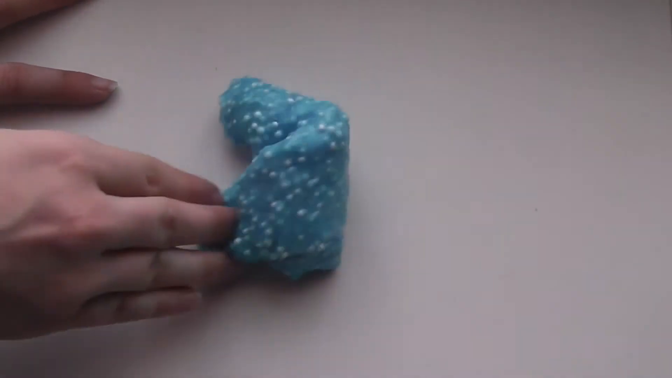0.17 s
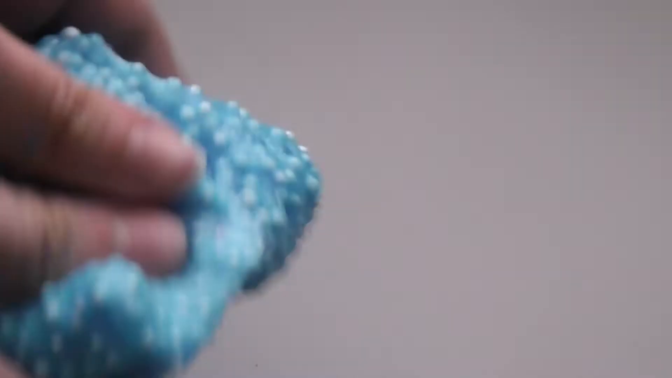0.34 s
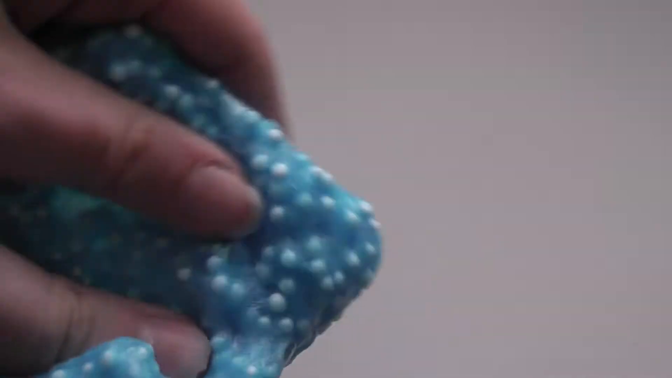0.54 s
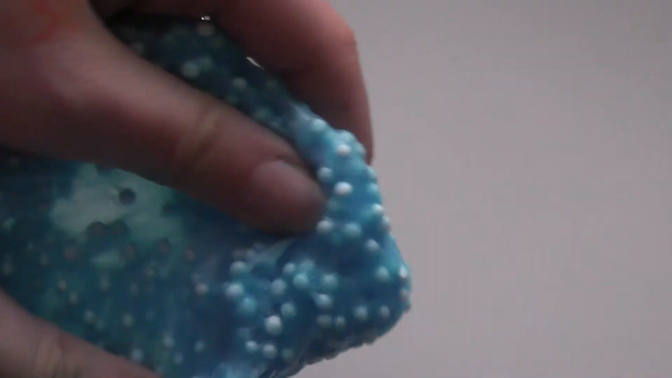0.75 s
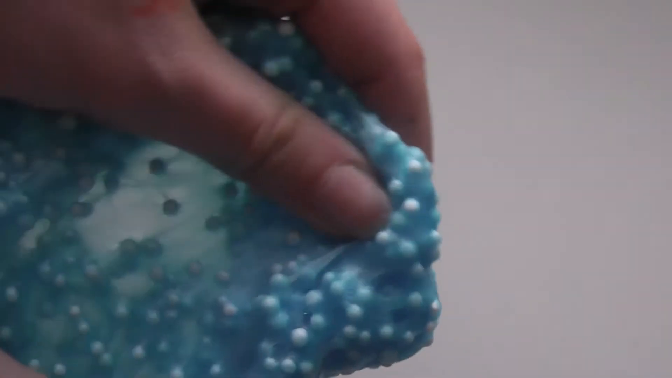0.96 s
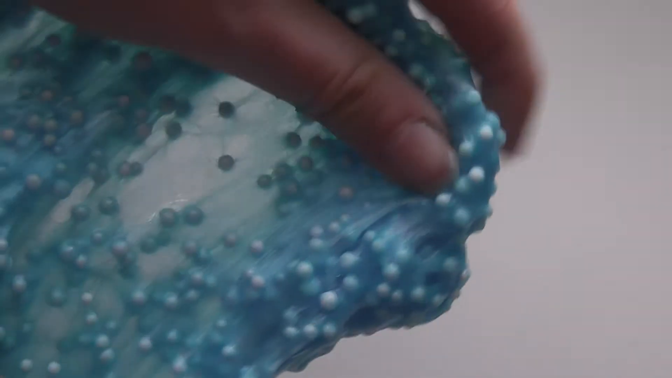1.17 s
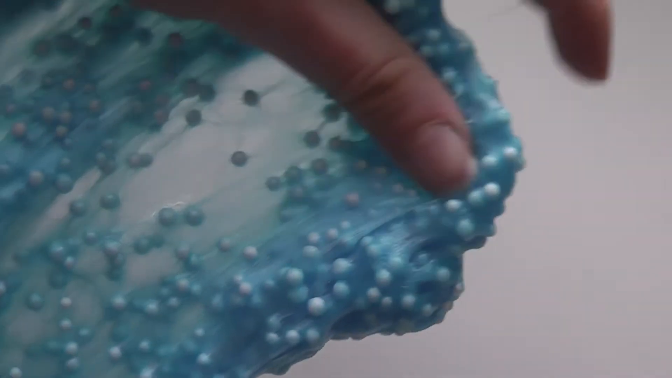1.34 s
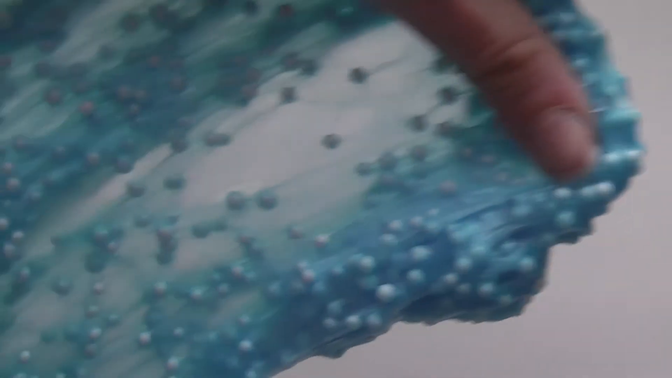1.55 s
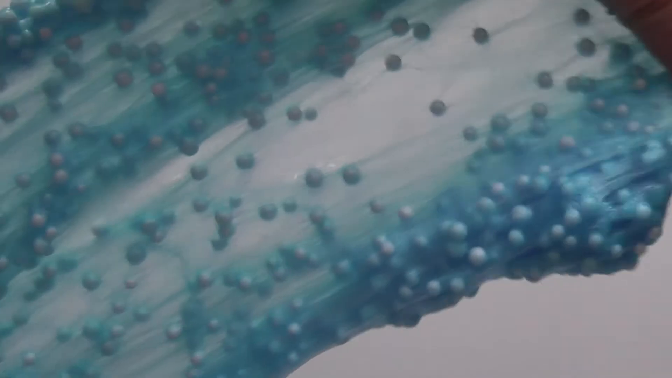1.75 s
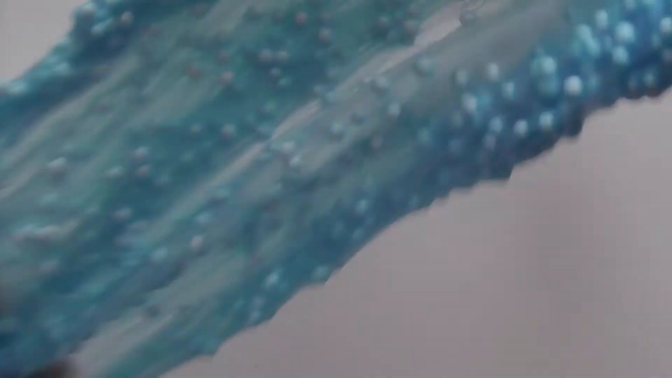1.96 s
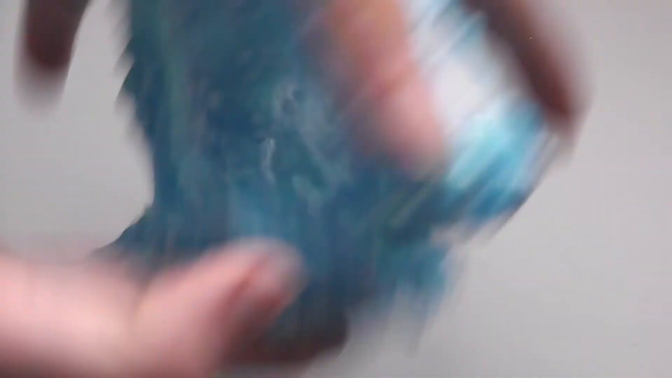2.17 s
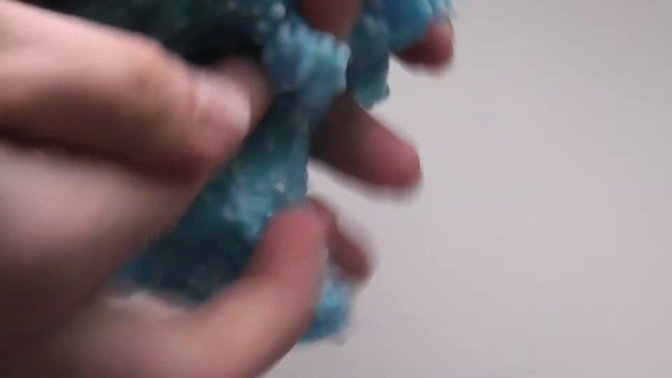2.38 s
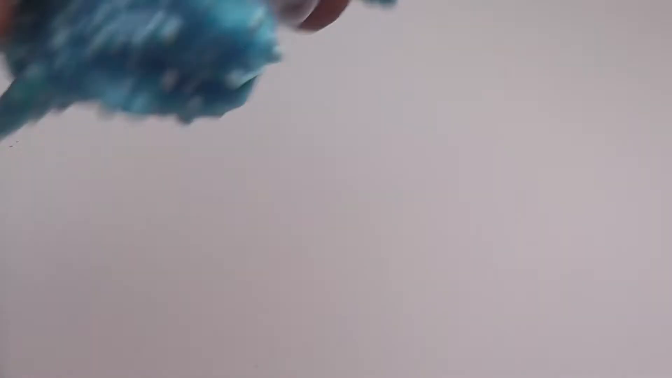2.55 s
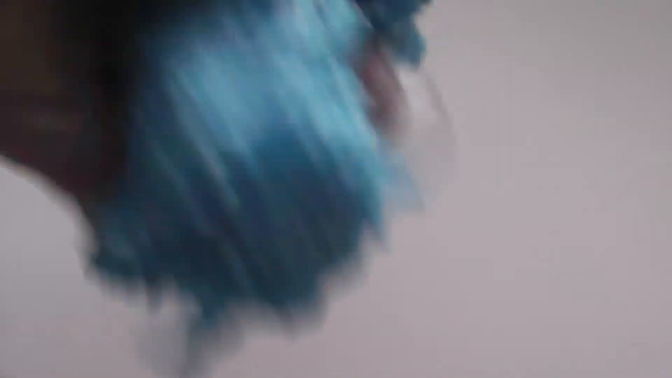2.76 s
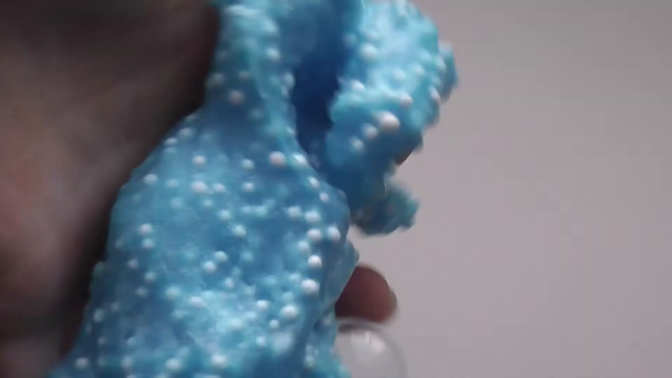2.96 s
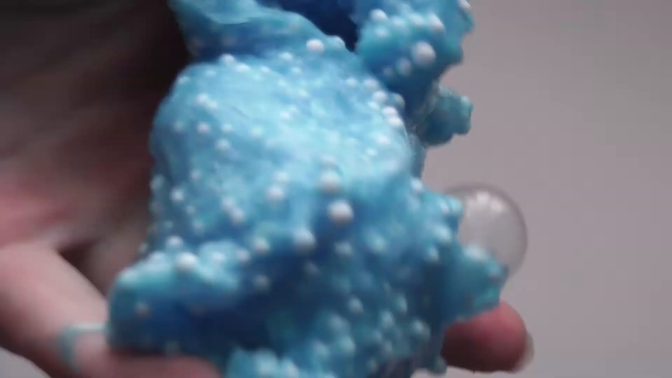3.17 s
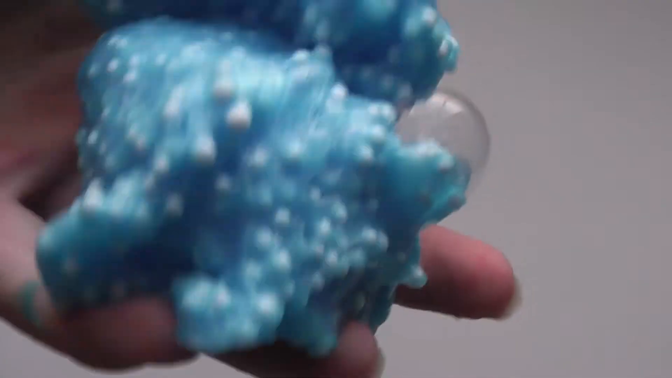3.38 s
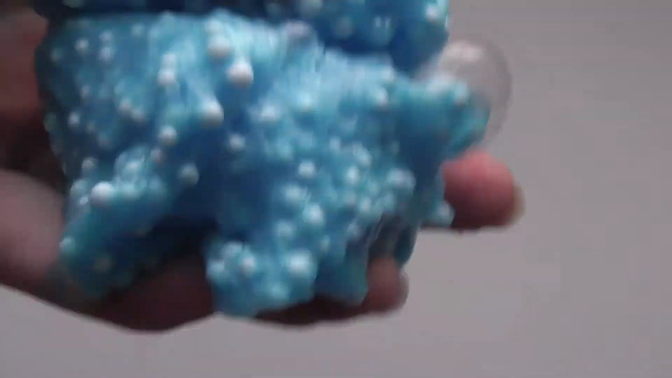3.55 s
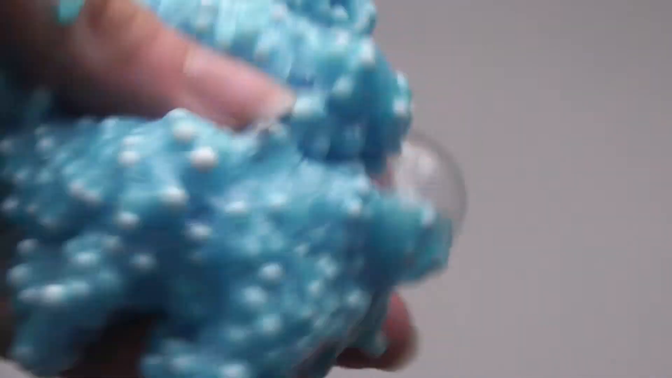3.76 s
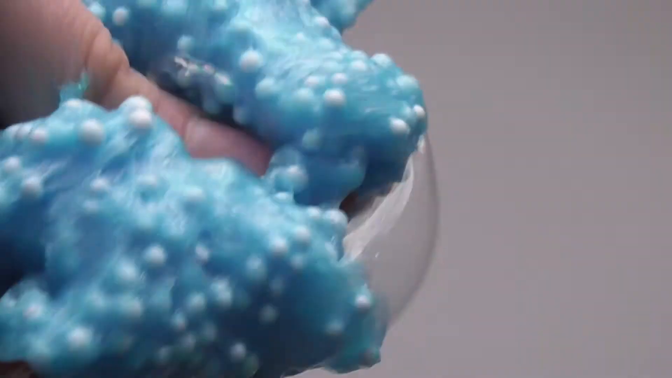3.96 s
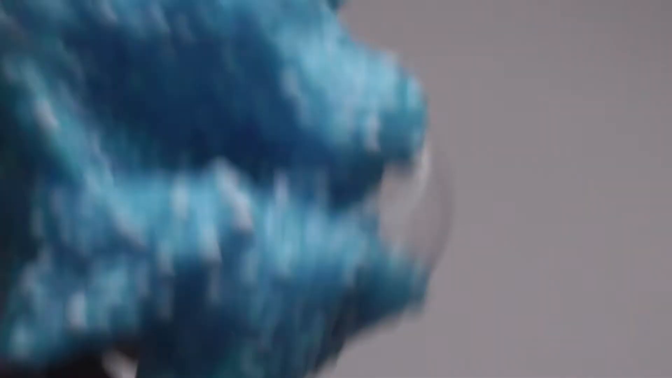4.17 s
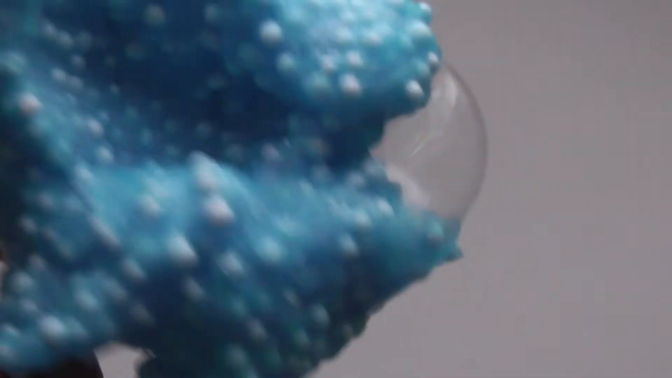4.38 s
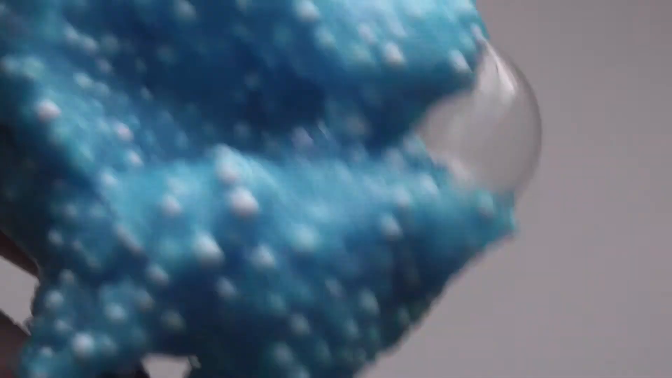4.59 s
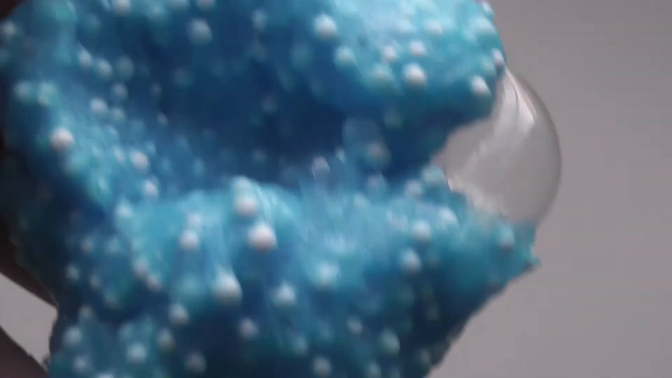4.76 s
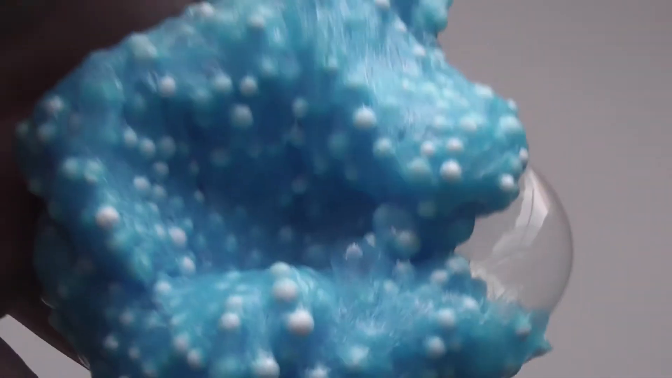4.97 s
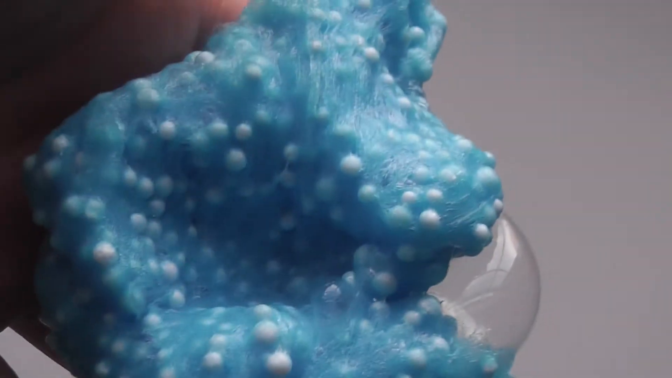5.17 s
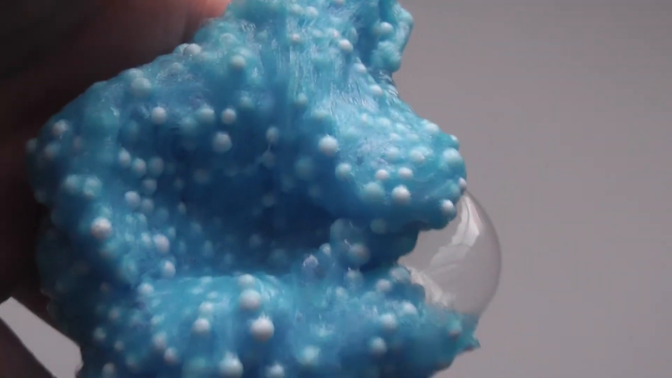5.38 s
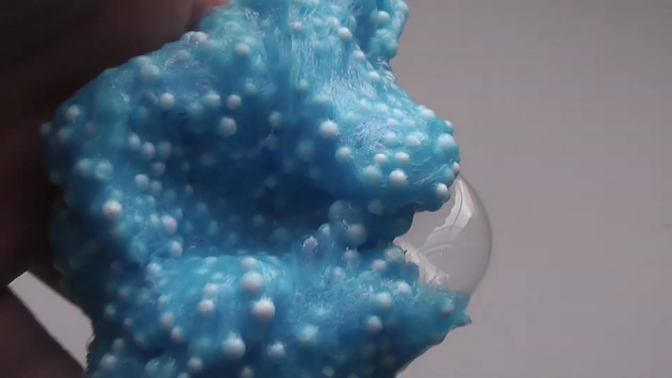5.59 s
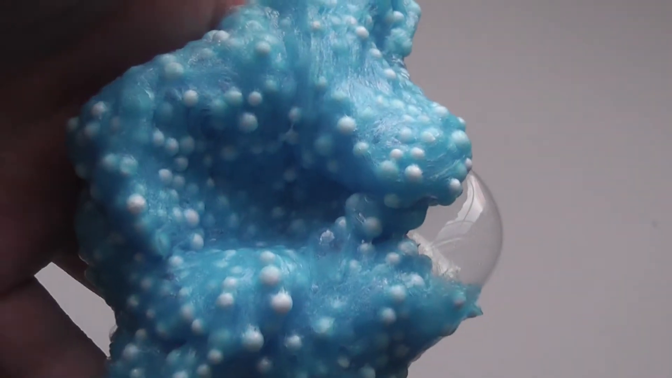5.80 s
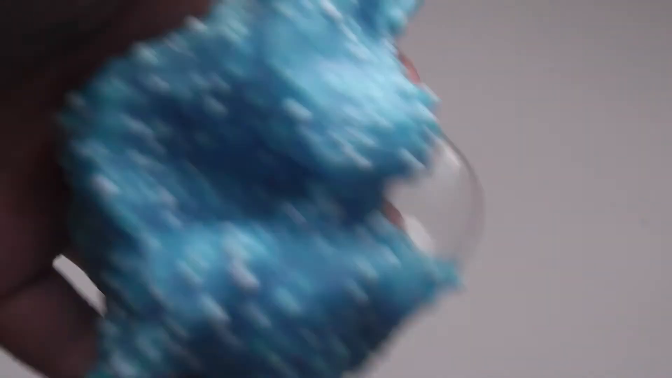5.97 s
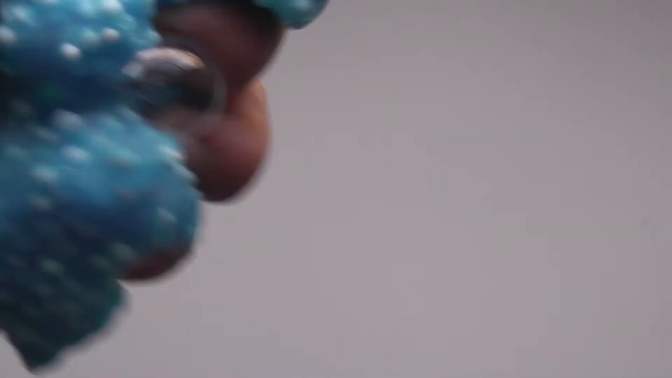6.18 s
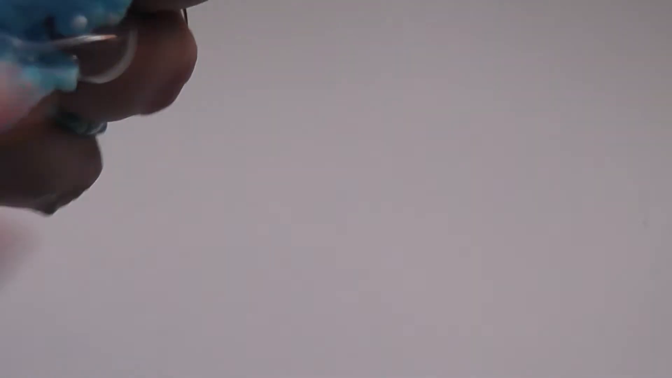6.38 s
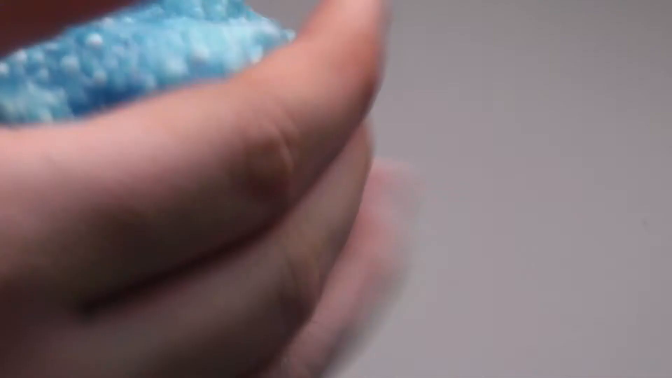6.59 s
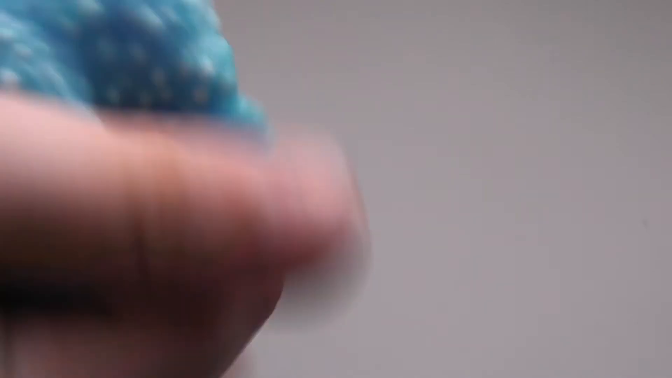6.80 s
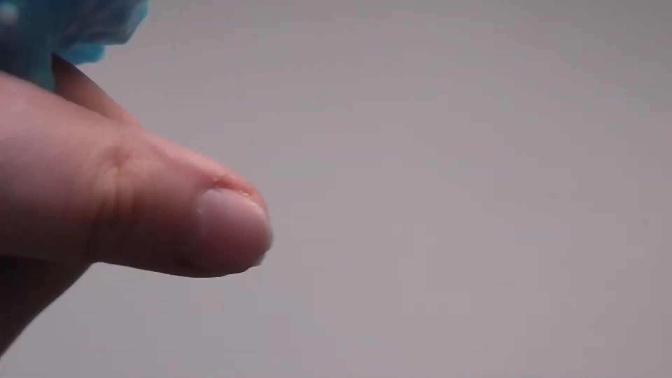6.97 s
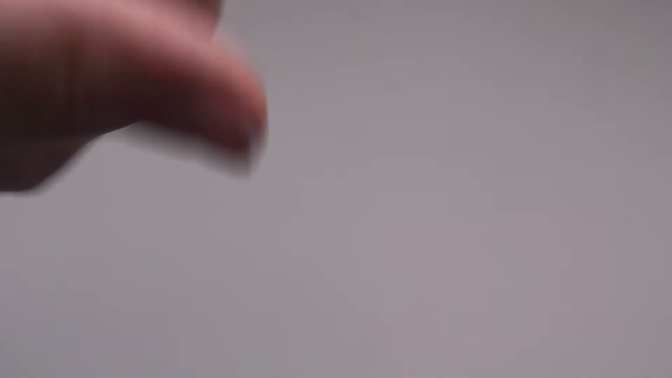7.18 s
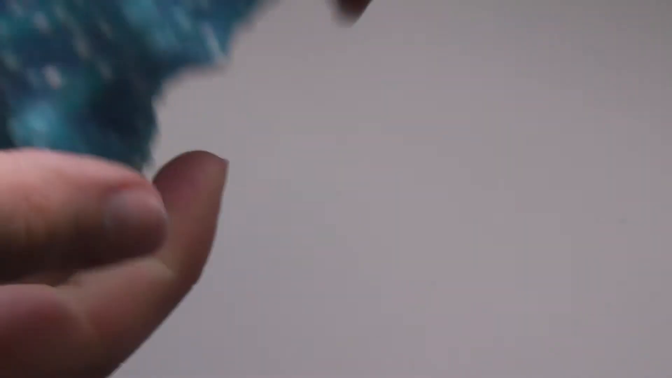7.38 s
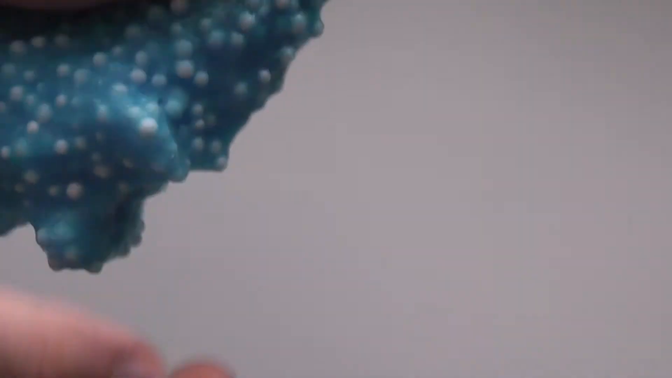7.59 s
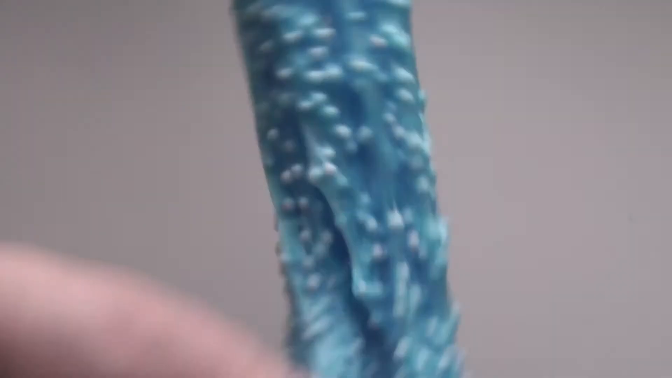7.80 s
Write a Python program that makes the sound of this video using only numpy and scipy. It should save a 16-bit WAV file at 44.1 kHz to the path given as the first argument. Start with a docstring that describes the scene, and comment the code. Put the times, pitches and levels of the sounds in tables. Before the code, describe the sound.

Very close stereo sound of hands working foam-bead slime in a small quiet room. Light crackles and snaps come first, then a sticky peel at two seconds and a dense flurry of snaps and pops. Another crunch near four seconds gives way to a nearly still stretch with isolated clucks and soft bumps, before busy crackling and breathy bubble pops return to the end.

```python
"""Foam-bead slime, close up

Hands squeeze and peel foam-bead slime in short strokes just in front of a small camera, in a quiet room.
Films tear as random impulses ringing small resonances; beads snap loose as decaying noise with a sharp crack.
Surface bubbles pop and puff at the microphone, and buried air pockets cluck through muffled cavity resonances.
Skin rubs as juddering filtered noise. A few dull bumps ring the camera's support; its focus motor ticks faintly.
"""
import sys
import numpy as np
from scipy import signal
from scipy.fft import rfft, irfft
from scipy.io import wavfile
from scipy.ndimage import uniform_filter1d

SR = 44100
rng = np.random.default_rng(int(sys.argv[2]) if len(sys.argv) > 2 else 0)


def output_pcm(signal):
    """Save a mono or channel-first signal as 16-bit PCM at the path in sys.argv[1].

    Samples are clipped to [-1, 1] before scaling.
    """
    pcm = np.clip(np.atleast_2d(signal).T, -1, 1) * 32767
    wavfile.write(sys.argv[1], SR, np.round(pcm).astype(np.int16))


N = 345744
TIME = np.arange(N) / SR  # s, whole scene
AGE = np.arange(2048) / SR  # s, since the onset of a short sound


def undb(db):
    """Decibels to gain."""
    return 10 ** (np.asarray(db) / 20)


def unit(x):
    """Each row scaled to rms 1."""
    return x / np.sqrt(np.mean(x ** 2, axis=-1, keepdims=True))


def noise(length=N):
    """Two independent rows of white noise."""
    return rng.standard_normal((2, length))


def steady(x, seconds):
    """Even out each row's level with a smoothed estimate of its short-term power."""
    n = int(seconds * SR)
    short_power = uniform_filter1d(uniform_filter1d(unit(x) ** 2, n), n)
    return unit(x) / np.sqrt(np.abs(short_power) + 1e-4)


def ring(x, hz, width_hz):
    """One resonance, gain 1 at its centre."""
    top = .45 * SR
    centre = min(hz, top)
    b, a = signal.iirpeak(centre, centre / min(width_hz, top), fs=SR)
    return signal.lfilter(b, a, x)


def resonate(x, modes):
    """Sum of parallel resonances given as (Hz, width Hz, dB)."""
    return sum(undb(db) * ring(x, hz, width) for hz, width, db in modes)


def cut(x, hz, kind):
    """Second-order low-pass or high-pass."""
    return signal.sosfilt(signal.butter(2, min(hz, SR / 2 - 100), kind, fs=SR, output="sos"), x)


def colour(x, points):
    """Shape a sound with a (Hz, dB) spectrum."""
    hz, db = np.transpose(points)
    f = np.maximum(np.fft.rfftfreq(N, 1 / SR), 1)
    return irfft(rfft(x) * undb(np.interp(np.log(f), np.log(hz), db)), N)


def mid_side(sound, side_db):
    """Set the gain of the side row; the mid row stays as it is."""
    return sound * undb(np.array([[0], [side_db]]))


def add(track, s, sound):
    """Mix a short sound in at time s."""
    i = max(int(s * SR), 0)
    track[:, i:i + sound.shape[1]] += sound[:, :N - i]


def burst(x, db):
    """Set a short sound's energy as if its level were spread over 5 ms."""
    return unit(x) * undb(db) * np.sqrt(.005 * SR / len(AGE))


def swell(start, hold, attack_s, release_s):
    """Exponential attack up to the start, a hold, then an exponential release."""
    attack = np.minimum((TIME - start) / attack_s, 0)
    release = np.minimum((start + hold - TIME) / release_s, 0)
    return np.exp(attack + release)


def swell_power(rows, attack_s, release_s):
    """Summed power over time of (start, hold, dB) swells."""
    return sum((undb(db) * swell(start, hold, attack_s, release_s)) ** 2 for start, hold, db in rows)


def walk(rate):
    """Random levels, each held 1 / rate s and slewed into the next."""
    n = max(int(SR / rate), 1)
    return uniform_filter1d(rng.standard_normal(N)[np.arange(N) // n], n)


# spectrum of the room's steady noise, relative: [f/Hz, level/dB per Hz]
ROOM_SPECTRUM = [(25, -21.5), (60, -4.5), (110, 2.5), (200, -1.5), (330, -4), (550, -4.5), (800, -7),
                 (1050, -3), (1500, -11.5), (2700, -9), (4500, -18), (8000, -26), (16000, -32)]


def room_tone(level_db=-67.5):
    """Steady shaped noise, independent in mid and side."""
    return unit(colour(noise(), ROOM_SPECTRUM)) * undb(level_db)


# skin slides on skin: [t at full level/s, hold/s, level/dB]
SKIN_RUBS = [(0, .3, -67), (2.1, 0.93, -74), (4.1, .3, -70.5), (6.15, 2.6, -78)]


def rubbing(hz=500, width_hz=240, low_hz=260, low_db=-3, judder_rate=30, judder_db=3):
    """Palms and fingers slide over each other with a soft, low rustle."""
    friction = noise()
    rustle = ring(friction, hz, width_hz) + undb(low_db) * ring(friction, low_hz, width_hz / 2)
    rustle = rustle * undb(judder_db * walk(judder_rate))  # the skin catches and lets go
    rustle = cut(cut(rustle, 820, "low"), 150, "high")
    return unit(rustle) * np.sqrt(swell_power(SKIN_RUBS, attack_s=0.099, release_s=0.128))


def strokes(rows, attack_s, release_s):
    """Power of one kind of hand stroke over time. Rows: crackle, squelch."""
    crackle = [(s, hold, db) for s, hold, db, _ in rows]
    squelch = [(s, hold, db + wet) for s, hold, db, wet in rows]
    return np.array([swell_power(crackle, attack_s, release_s), swell_power(squelch, attack_s, release_s)])


# Hand strokes: [t at full level/s, hold/s, crackle level/dB, squelch level relative to crackle/dB],
# both before the grip's wavering and the kneading mix.
# slime is drawn out or peels off the skin
PEEL_STROKES = [(1.982, 0.092, -45, -6), (2.83, 0.044, -48.5, -7.5), (3.2, 0.047, -55.5, -4),
                (4.166, 0.018, -43.5, -7), (6.572, 0.0465, -44, -2), (7.175, 0.028, -47.5, -3.5),
                (7.235, .1, -58, 1)]
# fingers press into the slime
SQUEEZE_STROKES = [(0.005, 0.11, -60.5, -8.5), (0.27, 0.013, -51.5, -4.5), (0.365, .27, -54, -12),
                   (0.652, 0.013, -52.5, -1.5), (0.69, 0.082, -60, -6.5), (1.085, 0.025, -61, -3),
                   (1.238, 0.028, -58.5, -5), (1.79, 0.037, -58, -3.5), (2.11, 0.089, -50.5, -5.5),
                   (2.22, 0.1, -58, 1.5), (2.375, 0.043, -50.5, -10), (2.435, 0.028, -46, -4.5),
                   (2.49, 0.18, -51, -13.5), (2.70, 0.14, -60.5, -22), (3.11, 0.21, -62, -11),
                   (3.226, 0.029, -55.5, -1.5), (3.352, 0.046, -59, -7), (3.855, 0.12, -58.5, -25),
                   (6.285, 0.18, -55.5, -13.5), (6.333, 0.008, -45.5, -18), (6.69, 0.18, -52, -5),
                   (6.825, 0.059, -45.5, -26), (6.92, 0.0056, -47.5, -6), (6.972, 0.064, -55.5, -29),
                   (7.105, 0.017, -51.5, 0), (7.385, 0.027, -54, -16), (7.51, .13, -58, -2),
                   (7.79, 0.055, -69.5, 3.5)]
# the lump keeps creeping in the hands between strokes
CREEPS = [(0, 1.38, -67, -4), (1.5, 1.15, -69, -3.5), (2.93, 0.086, -68.5, -3), (3.05, 0.43, -68, 0),
          (3.6, 0.56, -68.5, -10), (4.3, 0.075, -74.5, 4), (6.07, 0.2, -65, -7), (6.19, 1.45, -62.5, -8)]


def effort(rest_db=-92, grip_rate=49, grip_db=2):
    """All strokes together: crackle dB, squelch dB and the share that is peeling."""
    peeling = strokes(PEEL_STROKES, attack_s=0.022, release_s=0.025)
    squeezing = strokes(SQUEEZE_STROKES, attack_s=0.013, release_s=0.012)
    creeping = strokes(CREEPS, attack_s=0.018, release_s=0.079)
    total = peeling + squeezing + creeping + undb(rest_db) ** 2
    # the grip sticks and slips
    bright, wet = 10 * np.log10(total) + grip_db * walk(grip_rate)
    return bright, wet, peeling[0] / total[0]


def grains(rate, modes, spread_db, even_s, mix_db):
    """Tiny ruptures of very unequal size; each one rings the modes in its own mix. Rows: mid, side."""
    hit = rng.random(N) < rate / SR
    size = hit * undb(spread_db * np.minimum(rng.exponential(size=N), 4))
    out = 0
    for hz, width, db in modes:
        own_mix = undb(mix_db * rng.uniform(-1, 1, N)) * noise()
        out = out + undb(db) * ring(size * own_mix, hz, width)
    return steady(out, even_s)


def blips(rate, low_hz, high_hz, sharpness, count=16):
    """Small bubbles of many sizes, each ringing a few cycles at its own pitch."""
    out = 0
    for hz in np.geomspace(low_hz, high_hz, count):
        hit = (rng.random(N) < rate / count / SR) * noise()
        out = out + ring(hit, hz, hz / sharpness) / np.sqrt(hz)
    return steady(out, .15)


# resonances of tiny bubbles: [f/Hz, width/Hz, level/dB]
TINY_BUBBLES = [(3400, 2100, -2.5), (6600, 2400, -4.5), (9600, 1900, -1), (11700, 4000, -4.5)]
# resonances of larger wet folds: [f/Hz, width/Hz, level/dB]
WET_FOLDS = [(260, 530, -6), (574, 550, -3.5), (1250, 530, -2), (1830, 880, -1)]


def kneading(rate=1000, rate_growth=.8, crackle_db=0.5, squelch_db=-3, fizz_db=-9, peel_fizz_db=6,
             bright_blip_db=-8, wet_blip_db=-2, side_db=-4):
    """Squeezing tears films in separate ticks, more the harder it is; peeling merges them into a fine hiss."""
    bright, wet, peel = effort()
    tears = rate * undb(bright + 54.5) ** rate_growth + 60  # per s

    ticks = grains(tears * (1 + peel), TINY_BUBBLES, spread_db=4.2, even_s=.06, mix_db=6)
    # countless microscopic ruptures leave a fine fizz between the ticks
    fizz = unit(sum(undb(db) * ring(noise(), hz, width) for hz, width, db in TINY_BUBBLES))
    pings = blips(tears / 4, 2800, 12000, sharpness=12)
    crackle = ticks / np.sqrt(1 + peel / 2)
    crackle = crackle + undb(fizz_db + peel_fizz_db * peel) * fizz
    crackle = crackle + undb(bright_blip_db) * pings
    crackle = cut(cut(crackle, 1800, "high"), 17700, "low")

    smacks = grains(tears + 500, WET_FOLDS, spread_db=3, even_s=.05, mix_db=6)
    gurgle = blips(tears / 6 + 80, 600, 2600, sharpness=10)
    squelch = cut(smacks + undb(wet_blip_db) * gurgle, 110, "high")

    sound = crackle * undb(bright + crackle_db) + squelch * undb(wet + squelch_db)
    return mid_side(sound, side_db)


# the focus motor hunts: [t at full level/s, hold/s, level before the motor trim/dB]
FOCUS_HUNTS = [(.35, 0.69, -67.5), (1.3, 2.9, -75.5), (4.33, 0.52, -70), (5.13, 0.078, -67),
               (5.33, 0.28, -71.5)]
# what each step of the focus motor rings: [f/Hz, width/Hz, level/dB]
LENS_HOUSING = [(1050, 300, -4.5), (2856, 480, -0.5), (5780, 340, -14)]


def focus_motor(trim_db=-1, idle_db=-83, ramp_s=0.094, skip=0.21, scatter_db=5.5):
    """The lens steps on a regular 60 Hz grid, some ticks left out, the rest varying in strength."""
    steps = (np.arange(N) % (SR // 60) == int(.0142 * SR))
    kept = rng.random(N) > skip
    push = steps * kept * undb(scatter_db * rng.uniform(-1.4, 1, N))
    tick = 0
    for hz, width, db in LENS_HOUSING:
        tick = tick + undb(db) * ring(ring(push, hz, width), hz, 2.53 * width)
    drive = np.sqrt(swell_power(FOCUS_HUNTS, ramp_s, ramp_s) + undb(idle_db) ** 2)
    return unit(tick) * drive * undb(trim_db) * np.array([[1], [0]])  # in the middle: no side


def tear(db, hz, tear_ms, crack=2.2, sharpness=2.8, broad_db=-9, tail_db=-19, tail_s=0.006, wide_db=3.0):
    """A film gives way with a crack, rips on for a moment and rings the small cavity behind it."""
    rip = np.exp(-AGE * 1000 / tear_ms) + undb(tail_db) * np.exp(-AGE / tail_s)
    push = noise(len(AGE)) * rip
    push[:, 1] += 2 * crack  # one-sample kick
    sound = ring(push, hz, hz / sharpness) + undb(broad_db) * cut(push, 270, "high")
    # so close by, the two ports hear it rather differently
    return mid_side(burst(cut(sound, 15300, "low"), db), wide_db)


# beads snapping loose: [t/s, mid level over 5 ms/dB, ring f/Hz, tearing time/ms]
BEAD_SNAPS = [(0.0643, -44, 8400, 0.23), (0.1335, -50, 6600, 2.1), (0.1979, -52, 12300, 0.23),
              (0.2942, -45.5, 12700, 1.1), (0.3616, -41, 9000, 0.051), (0.574, -44, 10400, 0.98),
              (0.655, -40, 6860, 0.45), (0.702, -45, 8850, .2), (0.73, -43.5, 10000, .5),
              (0.859, -47.5, 7040, .2), (1.317, -46.5, 7960, 0.21), (2.059, -41.5, 6700, 7.1),
              (2.1296, -42.5, 9800, 3.8), (2.156, -44, 3930, 1), (2.198, -46, 11700, 1.7),
              (2.2993, -38.5, 4400, 1.3), (2.4039, -37, 8950, 2.8), (2.4757, -43, 11300, 0.77),
              (2.6084, -41, 7100, 3.9), (2.645, -33.5, 8660, .7), (3.305, -52.5, 9000, 1.6),
              (3.7194, -48, 8950, 1), (3.8237, -43.5, 5100, 1.1), (3.8578, -41.5, 6600, .7),
              (3.8644, -40, 6800, 1.2), (3.9046, -37.5, 6600, 1), (3.93, -41.5, 7150, 1.7),
              (3.9432, -40.5, 10000, 3.4), (4.0008, -47, 9860, 1.2), (4.0593, -52.5, 9600, 0.24),
              (4.335, -55, 10400, 0.54), (6.288, -43, 10500, 0.44), (6.3002, -45, 11400, 1.2),
              (6.346, -36.5, 9900, 2.6), (6.3796, -44.5, 11500, .4), (6.5248, -42.5, 9000, 1.7),
              (6.651, -38, 3240, 1.2), (6.6887, -39.5, 11500, 0.27), (6.6951, -42.5, 3900, 1.5),
              (6.8218, -37, 9600, 0.97), (6.8652, -33, 6100, 1.1), (6.926, -37, 3820, 1.9),
              (6.9342, -38.5, 11700, 0.83), (7.0008, -43, 11400, 1.4), (7.159, -37, 5000, 1.8),
              (7.392, -38.5, 4670, 1), (7.5585, -36.5, 5500, 0.58)]


def snaps():
    """Beads snap loose, each tearing its film with a crack."""
    out = np.zeros((2, N))
    for s, db, hz, ms in BEAD_SNAPS:
        add(out, s, tear(db, hz, ms))
    return out


# bubbles bursting at the surface, played by pops() and puffs():
# [t/s, mid level of the tear over 5 ms/dB, ring f/Hz, tearing time/ms, reference level of the air puff/dB]
BUBBLE_POPS = [(0.9171, -32, 7150, 1.4, -36), (2.5654, -31, 8040, 2.1, -38.5),
               (2.671, -33, 9250, 0.76, -40.5), (2.697, -31, 3800, 3.3, -48),
               (2.7203, -30, 10700, 0.77, -41.5), (3.5857, -33.5, 9240, 0.4, -37.5),
               (3.8758, -36, 13900, 0.81, -45.5), (3.9097, -38, 11500, 0.24, -42),
               (4.5036, -37, 10100, 0.2, -34), (6.0656, -36, 7350, 0.71, -39.5),
               (6.3167, -34, 10300, 0.37, -39.5), (6.3331, -37, 10200, 1.3, -37),
               (6.34, -35.5, 9900, 1.3, -42), (6.3956, -40.5, 9600, 0.3, -45),
               (6.446, -35.5, 10800, 0.67, -39), (6.83, -33, 6330, 2.6, -36.5),
               (6.8585, -34, 6360, 1.1, -43), (6.8805, -37.5, 9900, 0.52, -46),
               (6.958, -38, 10400, 0.22, -47), (7.5682, -35, 9300, 1.9, -35.5),
               (7.6465, -35.5, 10500, 1.3, -37.5)]


def pops(body_hz=350, body_db=-12, body_s=0.00035):
    """Surface bubbles crack like a torn film, with a short low plop as they collapse."""
    out = np.zeros((2, N))
    for s, db, hz, ms, puff_db in BUBBLE_POPS:
        collapse = noise(len(AGE)) * np.exp(-AGE / body_s)
        plop = cut(ring(collapse, body_hz, body_hz), 2 * body_hz, "low")
        add(out, s, tear(db, hz, ms) + burst(plop, puff_db + body_db))
    return out


def puff(db, swing_hz, decay_s, rise_s):
    """Escaping air pushes the diaphragm once; the port's vent lets it swing back softly."""
    pressure = -np.exp(-AGE / decay_s) * (1 - np.exp(-AGE / rise_s)) ** 2
    wave = cut(pressure, swing_hz, "high")
    return (undb(db) * wave / np.abs(wave).max())[None]


def puffs(left_db=4, right_db=1, eddy_db=-12, eddy_hz=420, eddy_s=0.002):
    """Each burst bubble blows on the left port, then more softly on the right, and eddies in each. Rows: L, R."""
    out = np.zeros((2, N))
    for s, _, _, _, db in BUBBLE_POPS:
        left = puff(db + left_db, swing_hz=86.7, decay_s=0.0047, rise_s=0.00063)
        right = puff(db + right_db, swing_hz=62.3, decay_s=0.0026, rise_s=0.00052)
        add(out[:1], s, left)
        add(out[1:], s + rng.uniform(0.00051, 0.00062), right)
        eddy = noise(len(AGE)) * np.exp(-AGE / eddy_s)
        add(out, s, burst(cut(eddy, eddy_hz, "low"), db + eddy_db))
    return out


# air pockets opening inside the lump: [t/s, level over 5 ms/dB, cavity f/Hz, opening time/ms]
AIR_POCKETS = [(1.148, -52, 1150, 4.6), (1.61, -53, 1250, 5), (1.824, -55, 1590, 1),
               (2.283, -45, 1700, 6.1), (2.295, -39, 1310, 1.9), (2.699, -34.5, 650, 1.03),
               (3.21, -44, 1780, 5.1), (3.384, -46, 1310, 9.6), (3.477, -40, 2020, 2.4),
               (3.6654, -43, 1060, 5.8), (4.926, -39, 1980, 3), (5.573, -40.5, 1696, 2.7),
               (5.854, -42, 1780, 2.5), (5.93, -45, 1100, 4), (6.761, -43, 1050, 3.9),
               (7.088, -44.5, 436, 7.9), (7.097, -43.5, 820, 3.2), (7.105, -39.5, 990, 2.3),
               (7.115, -44, 1510, 1.2)]
# resonances of the cupped hands: [f/Hz, width/Hz, level/dB]
CUPPED_HANDS = [(678, 150, -1.5), (1250, 180, -18.5), (2260, 73, -19), (2820, 220, -22.5), (3610, 500, 1),
                (5500, 770, -14)]


def pockets(sharpness=0.42, open_db=-5, muffle=3, opening=0.46, leak_db=-17, narrowing=1.1):
    """Buried air pockets pull open and cluck, muffled by the slime and coloured by the cupped hands."""
    out = np.zeros((2, N))
    for s, db, hz, ms in AIR_POCKETS:
        age = AGE * 1000 / ms
        push = noise(len(AGE)) * np.exp(-age) * (1 - np.exp(-age / opening))
        # a narrow neck opens slowly and rings with a clearer pitch
        cavity = ring(push, hz, hz / (sharpness * ms ** narrowing))
        cavity = cut(cavity, muffle * hz, "low")
        sound = undb(open_db) * cavity + resonate(cavity, CUPPED_HANDS)
        leak = cut(push, 4 * hz, "low")  # air hissing out through the opening
        add(out, s, burst(sound + undb(leak_db) * leak, db))
    return out


# dull bumps: [t of the peak/s, level before the shake trim/dB, rise/s, decay/s]
DULL_BUMPS = [(3.742, -40, 0.023, 0.079), (4.13, -63.5, 0.06, 0.068), (4.495, -43.5, 0.0094, 0.1),
              (5.13, -48, 0.018, 0.092)]
# what the bumps shake: [f/Hz, width/Hz, level/dB]
CAMERA_SUPPORT = [(57.2, 13, -4), (92.7, 15, 2.5), (161.8, 41, -4.5)]


def bumps(side_db=-12, shake_db=-1):
    """Dull knocks swell the ringing of the camera's support, with an uneven shudder, and die away."""
    shudder = sum(undb(db) * ring(noise(), hz, width) for hz, width, db in CAMERA_SUPPORT)
    shudder = steady(cut(cut(shudder, 280, "low"), 215, "low"), 0.034)
    out = 0
    for s, db, rise, decay in DULL_BUMPS:
        tone = 0
        for hz, _, mode_db in CAMERA_SUPPORT:
            phase = rng.random((2, 1))  # in turns
            tone = tone + undb(mode_db) * np.sin(2 * np.pi * (hz * TIME + phase))
        envelope = np.exp(-np.maximum((s - TIME) / rise, (TIME - s) / decay))
        out = out + undb(db + shake_db) * envelope * (unit(tone) + shudder) / np.sqrt(2)
    return mid_side(out, side_db)


def reflections(x, near_db=-14, near_s=0.0014, far_db=-24):
    """Quick scatter from hands and table, then the faint, duller tail of the room. Rows: mid, side."""
    t = np.arange(SR // 3) / SR
    near = noise(len(t)) * np.exp(-t / near_s) * (t > .001)
    far = cut(noise(len(t)), 5000, "low") * undb(-60 * t / .2) * (t > .006)  # falls 60 dB in 0.2 s
    response = (undb(near_db) * unit(near) + undb(far_db) * unit(far)) / np.sqrt(len(t))
    return signal.fftconvolve(x[:1], response, axes=1)[:, :N]  # driven by the mid alone


# stereo width, as a gain on the side signal: [f/Hz, level/dB]
SIDE_GAIN = [(60, -8.5), (200, 1.5), (380, -1), (1290, -6), (2400, -22), (8100, -22.5), (12000, -7),
             (15000, -3.5)]


def scene(left_db=0.3):
    """The slime a little to the left, over room tone and the camera's own noises. Rows: left, right."""
    room, skin = room_tone(), rubbing()
    slime = kneading() + snaps() + pops() + pockets()
    mid, side = slime + reflections(slime) + room + skin + focus_motor()
    mid, side = np.array([mid, colour(side, SIDE_GAIN)]) + bumps()
    left = (mid + side) * undb(left_db / 2)
    right = (mid - side) * undb(-left_db / 2)
    return np.array([left, right]) + puffs()


def record(dry, notch_hz=2510, notch_width_hz=130, top_hz=15900):
    """The camera has a narrow notch in the upper middle and cuts the top of the treble."""
    notched = dry - ring(dry, notch_hz, notch_width_hz)
    return signal.sosfilt(signal.ellip(10, .2, 70, top_hz, fs=SR, output="sos"), notched)


dry = scene()
out = record(dry)
output_pcm(out)
```